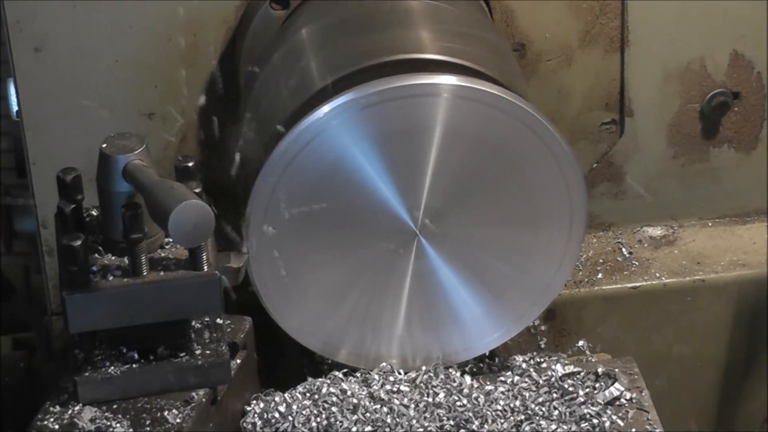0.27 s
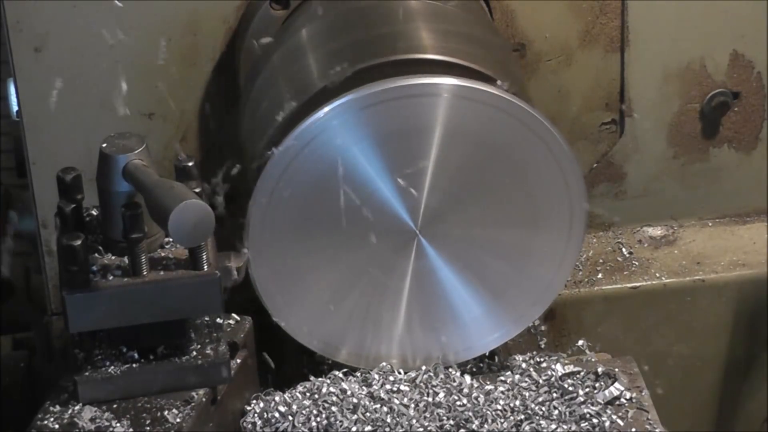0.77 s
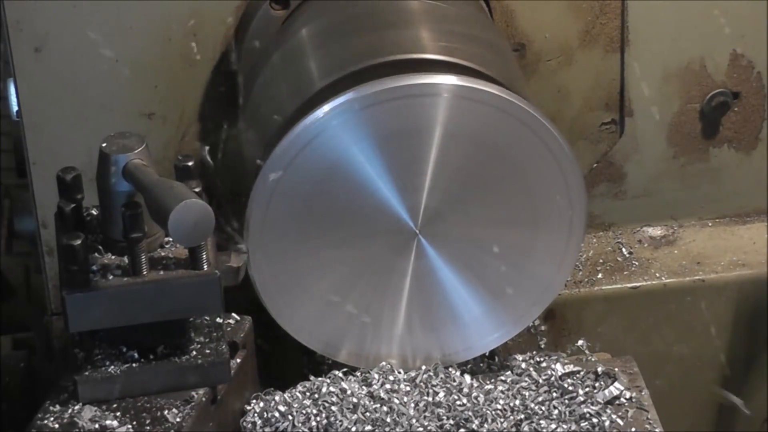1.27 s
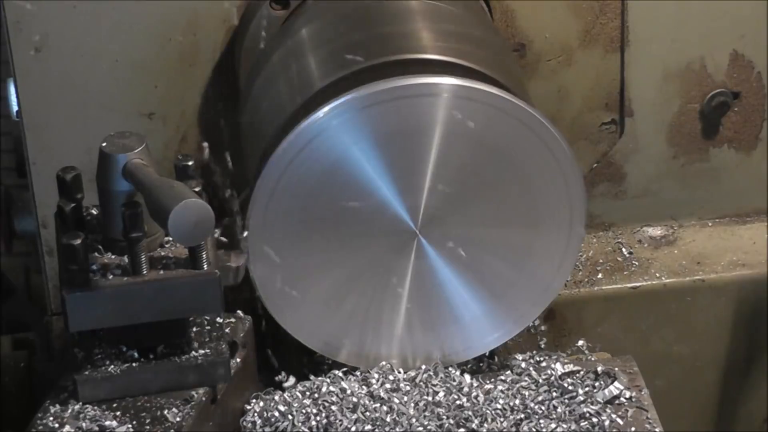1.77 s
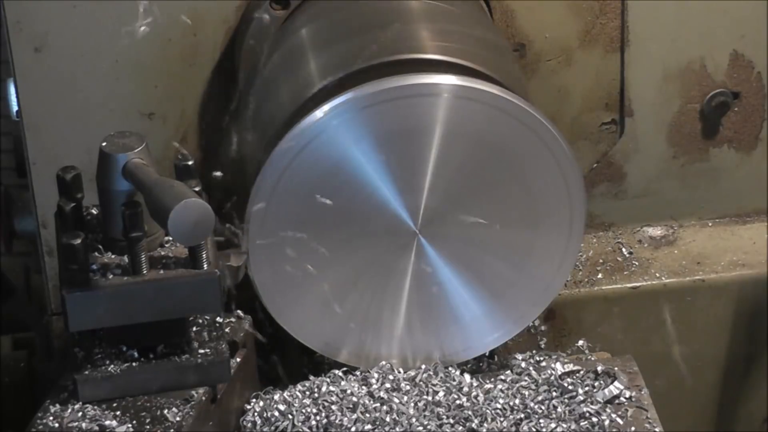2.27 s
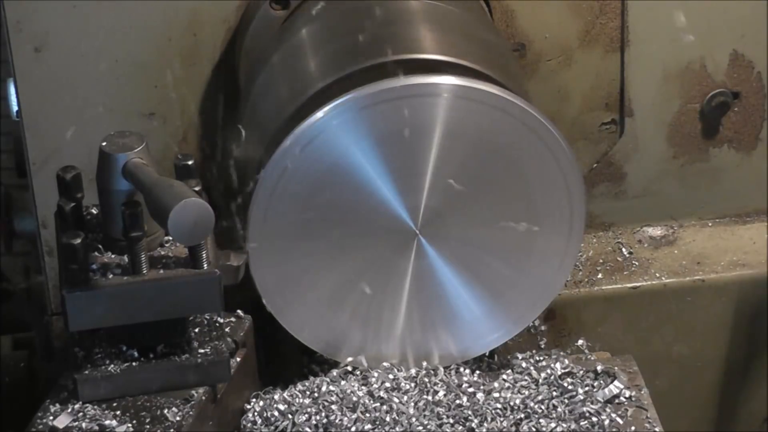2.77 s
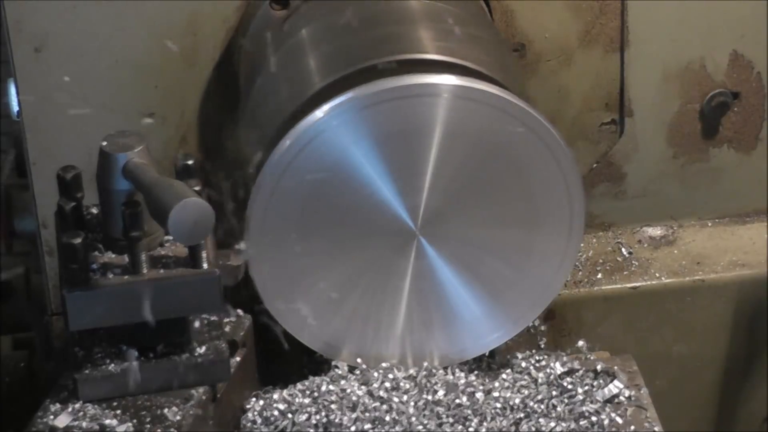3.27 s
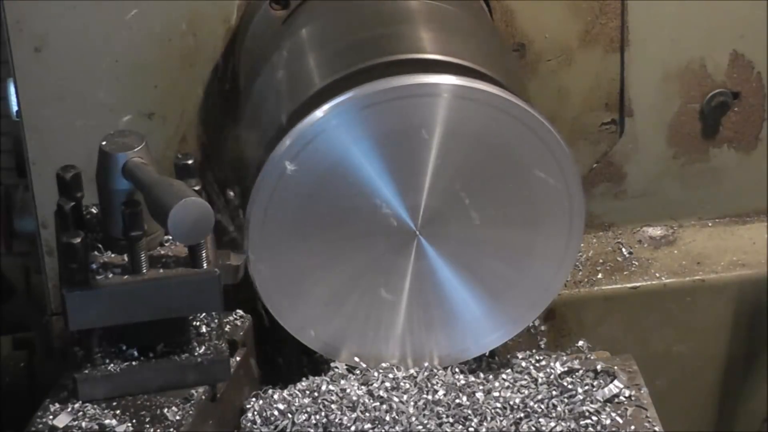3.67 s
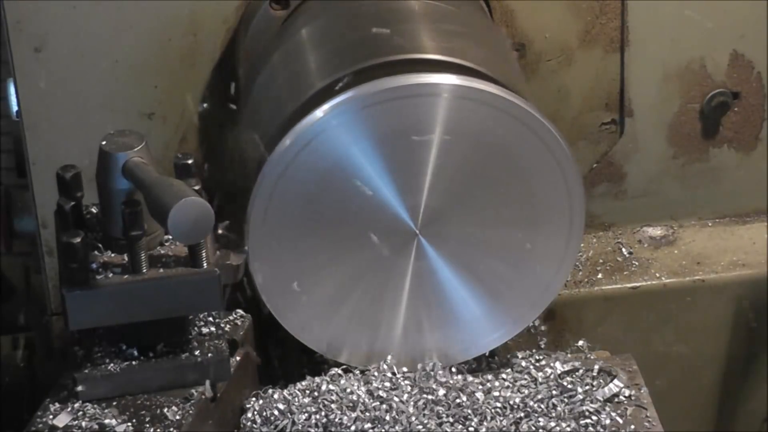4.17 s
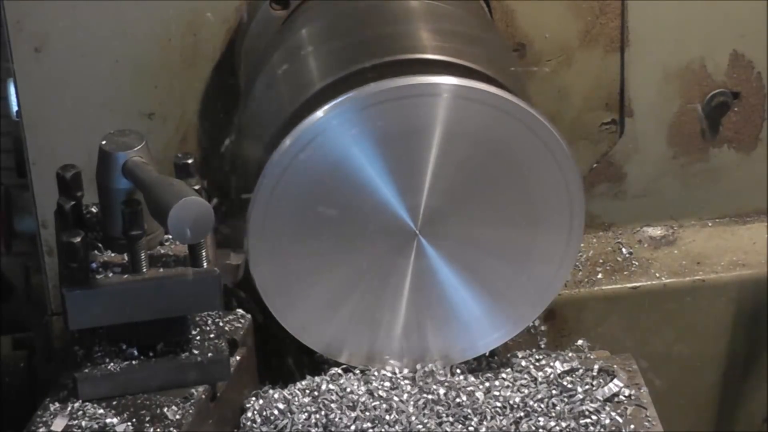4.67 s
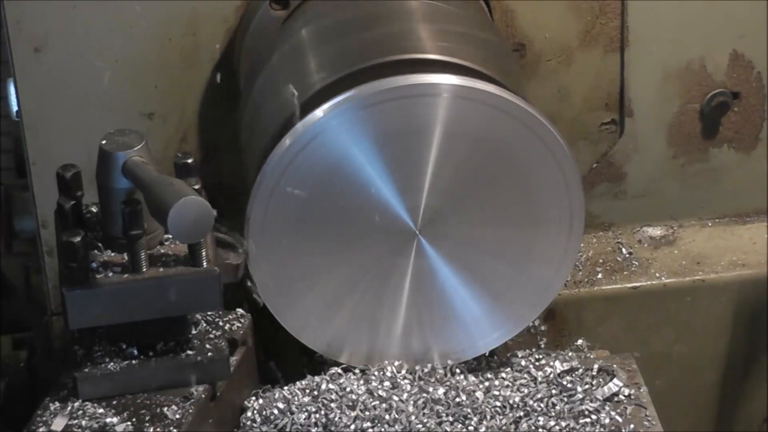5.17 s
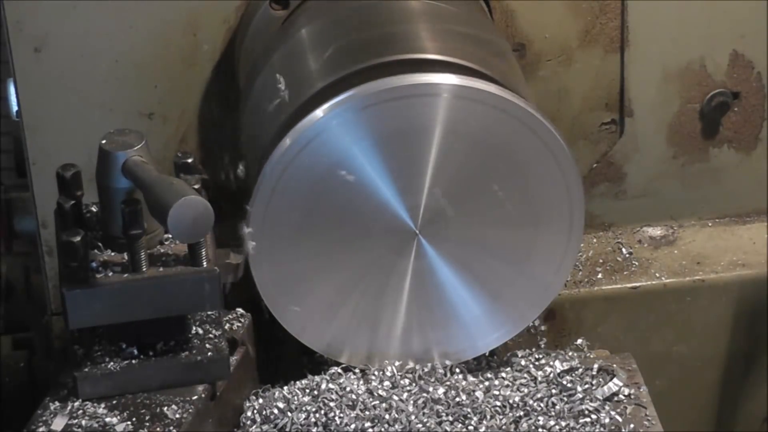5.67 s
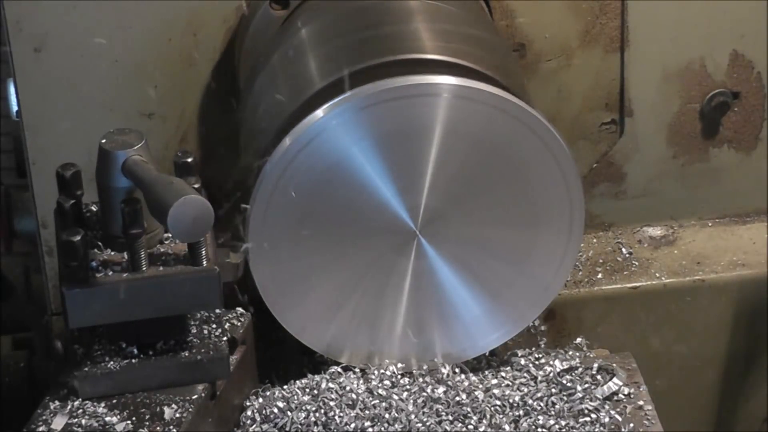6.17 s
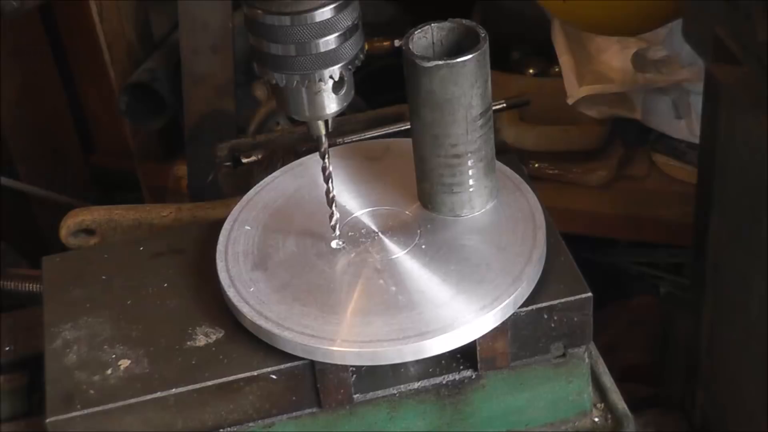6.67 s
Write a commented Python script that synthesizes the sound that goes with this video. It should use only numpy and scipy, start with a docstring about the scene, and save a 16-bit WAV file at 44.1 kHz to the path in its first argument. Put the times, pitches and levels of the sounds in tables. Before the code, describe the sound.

Close and loud, a cutting tool tears across a fast-turning metal face: gritty rasp, ringing disc and holder, shrill chatter squeal and a higher whistle, all pulsing rapidly with each turn. Low casting rumble and soft gear whines run steadily underneath, weighted right, with a brief cabinet boom past the middle. The cut never pauses; the sound simply stops dead.

```python
"""A lathe tool scrapes across a cast metal disc turning about 15 times a second; the sound is cut off at the end.
The tool rides over the waves it cut one turn earlier, so the scrape throbs with the spindle.
Two modes of the tool break into chatter: a squeal near 4 kHz and a whistle near 7 kHz.
Underneath, filtered noise makes the headstock rumble, sines make its gears whine, and the motor hums."""
import sys
import numpy as np
from scipy.fft import rfft, irfft, next_fast_len
from scipy.io import wavfile
from scipy.ndimage import uniform_filter1d, map_coordinates

SR = 44100
rng = np.random.default_rng(int(sys.argv[2]) if len(sys.argv) > 2 else 0)


def put_to_file(sound):
    """Save the sound as 16-bit audio at rate SR, in the file named by the first command-line argument."""
    columns = np.atleast_2d(sound).T  # one column per channel
    safe = np.clip(columns, -1, 1)
    whole_steps = np.round(safe * 32767)
    wavfile.write(sys.argv[1], SR, whole_steps.astype(np.int16))


N = 304731  # samples in the whole sound


def amp(db):
    """Turn decibels into a gain."""
    return 10 ** (np.asarray(db) / 20)


def unit(x):
    """Scale a signal to an rms (average strength) of 1."""
    return x / np.sqrt(np.mean(np.abs(x) ** 2) + 1e-20)


def clock():
    """Seconds at each sample."""
    return np.arange(N) / SR


def along(points, hz):
    """Read a curve of (Hz, value) points on a log frequency axis."""
    point_hz, values = np.transpose(points)
    return np.interp(np.log(hz + 1), np.log(point_hz + 1), values)


def curves(rows):
    """Join timed rows with straight lines: one curve for each column after the time."""
    seconds, *columns = np.transpose(rows)
    return [np.interp(clock(), seconds, column) for column in columns]


def wobble(rate):
    """A smooth random curve through `rate` random points a second."""
    points = rng.standard_normal(int(N * rate / SR) + 4)
    return map_coordinates(points, [np.arange(N) * rate / SR])


def swell(s, half_length_s, lift_db):
    """A smooth rise and fall in dB, highest at s seconds."""
    return lift_db * np.exp(-.5 * ((clock() - s) / half_length_s) ** 2)


# How hard the tool is fed into the face. Each row: time in seconds, load in dB about the usual.
LOAD = [(0.0, -0.15), (0.5, 0.5), (0.6, -0.8), (1.4, -0.26), (2.0, 0.8), (2.8, -0.6), (3.4, 1.3), (3.5, -2),
        (4.0, 0.1), (4.2, 1.8), (4.8, 0.7), (5.2, 2.5), (5.5, -3), (5.9, 1), (6.1, -1.8), (6.5, -1.2)]


def level(start_db, drift_db_per_s, follow):
    """Level in dB of a part that drifts steadily and follows the load."""
    return start_db + drift_db_per_s * clock() + follow * curves(LOAD)[0]


def filtered(x, response):
    """Shape the spectrum of x by a function of frequency."""
    size = next_fast_len(N + SR // 4)  # spare room so that the end does not wrap onto the start
    spectrum = rfft(x, size) * response(np.fft.rfftfreq(size, 1 / SR))
    return irfft(spectrum, size)[..., :N]


def peak(offset_hz, width_hz):
    """Gain of a resonance with steep skirts, offset_hz from its centre."""
    return 1 / (1 + (offset_hz / width_hz) ** 2)


# How alike left and right are. Each row: frequency in Hz, likeness (1 is identical).
LIKENESS = [(40, .15), (90, .45), (190, .88), (240, .97), (290, .78), (400, .8), (1000, .67), (1900, .76),
            (2400, .9), (4000, .95), (10000, .99), (14000, .72)]


def body(pair, modes, bed=None):
    """Two unrelated forces ring a body's modes and noise bed; stereo whose middle has rms 1."""
    def response(hz):
        power = sum((amp(db) * peak(hz - centre, width)) ** 2 for centre, width, db in modes)
        if bed is not None:
            power = power + amp(along(bed, hz)) ** 2
        # the less alike the two ears, the more goes to the side signal
        spread = np.arccos(np.clip(along(LIKENESS, hz), -1, 1)) / 2
        return np.sqrt(power) * np.array([np.cos(spread), np.sin(spread)])
    mid, side = filtered(pair, response)
    return np.array([mid + side, mid - side]) / np.std(mid)


# The motor's level. In order: dB at the start, drift in dB per second, dB per dB of load.
HUM_LAW = (-41, -1.5, .3)


def motor(hum_hz=120):
    """The motor's iron hums at twice the mains frequency, slowly easing off."""
    phase = 2 * np.pi * hum_hz * clock() + 0.11 * wobble(4.4)
    hum = unit(np.sin(phase))
    return amp(level(*HUM_LAW) + .7 * wobble(5.4)) * hum


# Resonances of the headstock casting. Each row: centre in Hz, width in Hz, relative dB.
CASTING = [(372, 24.4, -2.5), (422.5, 5.7, -1), (474, 20, -2.5), (544, 23, -7), (709.5, 15, -3),
           (728, 19, -7), (970.4, 12, -4), (1093, 8.9, -8.5)]
# Broad noise between those resonances. Each row: frequency in Hz, relative dB per Hz.
RUMBLE = [(20, -56), (45, -40), (70, -38.5), (90, -27.5), (135, -19), (170, -28.5), (220, -17), (330, -16),
          (600, -14), (1200, -15.5), (2000, -15), (5000, -66.5)]
# Gear whines. Each row: cycles per spindle turn, dB before the shared level and wobble.
GEARS = [(28, -42), (46, -37.5), (48, -44), (64, -44.5), (72, -41)]
# The cabinet's resonance. Each row: centre in Hz, width in Hz, relative dB.
CABINET = [(238.5, 10.5, 0)]
# Swells of the sheet-metal cabinet. Each row: peak time in seconds, half length in seconds, lift in dB.
BOOMS = [(1.85, 0.092, 2.5), (4.248, 0.078, 7.5)]
# Levels before trims. In order: dB at the start, drift in dB per second, dB per dB of load.
HEADSTOCK_LAW = (-22.5, -0.54, .9)
CABINET_LAW = (-32, -0.94, .7)


def headstock(turns):
    """Gear teeth rattle the casting, shake the cabinet and whine in step with the spindle."""
    drive_db = level(*HEADSTOCK_LAW)
    rumble = amp(drive_db - 1.0) * body(rng.standard_normal((2, N)), CASTING, RUMBLE)
    boom_db = level(*CABINET_LAW) + sum(swell(*row) for row in BOOMS)
    boom = amp(boom_db) * body(rng.standard_normal((2, N)), CABINET)
    whine = 0
    for teeth, db in GEARS:
        gain = amp(db + 1.4 * wobble(6))
        whine = whine + gain * np.sin(2 * np.pi * teeth * turns + 0.5 * wobble(9))
    # the whine follows only the changes in drive, not its overall level
    return rumble + boom + amp(drive_db - drive_db.mean() + 3.0) * whine


TURN_SIZE = 2900  # points of surface around one turn
# How well the surface waves last. Each row: time in seconds, share that survives one turn.
MEMORY = [(0, 0.81), (1.5, 0.7), (3.4, 0.67), (3.9, 0.91), (6.5, .9)]


def groove(turns):
    """Two noises read off the turning face: each turn inherits part of the last turn's waves."""
    waves = rng.standard_normal((2, int(turns[-1]) + 2, TURN_SIZE))
    kept = np.interp(np.arange(waves.shape[1]), turns, curves(MEMORY)[0])
    kept = np.clip(kept, 0, .98)
    for k in range(1, len(kept)):
        fresh = np.sqrt(1 - kept[k] ** 2)  # new roughness keeps the total strength steady
        waves[:, k] = kept[k] * waves[:, k - 1] + fresh * waves[:, k]
    return np.array([map_coordinates(w.ravel(), [turns * TURN_SIZE]) for w in waves])


# Wavy and smooth sectors of the face, met once a turn; each builds up and wears away.
# Each row: deepest time in seconds, half length in seconds, place in turns, half width in turns,
# then the dB lifts of scrape, squeal and whistle before limiting and evening out.
SECTORS = [(.6, .8, 0.2, 0.11, -1.5, 7.5, 5), (4.3, 1.1, 0.2, 0.031, -0.5, 7.5, 3.5),
           (5.16, 0.48, 0.34, 0.1, 7, -2, 4), (5.2, 1.5, .65, .05, 1, 0.5, 0.5),
           (4.9, 2.5, .75, .06, -0.5, 4.5, 3.5), (5.6, .7, 0.87, .085, -10.5, -9, -8),
           (5.7, 1.1, 0.48, 0.045, 0.5, -6, -9), (6.1, .5, 0.24, .08, 0, 8.5, 11)]
# Smaller patches come and go: seconds between fresh patterns, then dB depth for scrape, squeal, whistle.
PATCH_LIFE_S, PATCH_DB = 0.4286, (-1.5, 1, 2.5)


def throbs(turns, reach_db=9, order=32, count=18):
    """Gains of scrape, squeal and whistle as sectors and `count` chance patches pass under the tool."""
    t = clock()
    coarse, angle = t[::order], turns[::order]  # worked out at every 32nd sample
    db = np.zeros((3, len(coarse)))
    for s, life, place, width, *lift_db in SECTORS:
        away = (angle - place + .5) % 1 - .5  # shortest way round the face, in turns
        shape = np.exp(-.5 * ((coarse - s) / life) ** 2 - .5 * (away / width) ** 2)
        db += np.outer(lift_db, shape)
    for part, face in enumerate(rng.standard_normal((3, order, count))):
        spot = [coarse / PATCH_LIFE_S, angle % 1 * count]
        db[part] += PATCH_DB[part] * map_coordinates(face, spot, mode="grid-wrap")
    # lifts and dips level off smoothly at reach_db
    gain = amp(reach_db * np.tanh(db / reach_db))
    # evened out over about two turns, so the throb only shifts energy around
    gain = gain / np.sqrt(uniform_filter1d(gain ** 2, 2 * TURN_SIZE // order))
    return [np.interp(t, coarse, g) for g in gain]


def chatter(turns, pitch, throb, width_hz, limit):
    """A tool mode fed by its own waves; the swing levels off as the tip starts to leave the cut."""
    a, b = filtered(groove(turns), lambda hz: peak(hz, width_hz))
    swing = unit(throb * (a + 1j * b))
    swing = unit(swing / np.sqrt(1 + np.abs(swing / limit) ** 2))
    # shift the slow swing up to the pitch of the mode
    carrier = np.exp(2j * np.pi * np.cumsum(pitch) / SR)
    return unit(np.real(swing * carrier))


def slow_bursts(turns, depth, width_hz):
    """Uneven force from slow surface waves, which partly return on the next turn."""
    slow = unit(filtered(groove(turns)[0], lambda hz: peak(hz, width_hz)))
    return unit(amp(depth * slow))


# Resonances of disc, tool holder, shank and tip. Each row: centre in Hz, width in Hz, relative dB.
DISC = [(1383.6, 15, 7), (1495, 140, -0.5), (1469, 48, 2.5), (1764, 13, -0.5)]
HOLDER = [(1995, 48, -10.5), (2384, 120, 0), (2479, 66, 1), (2676, 18, -2), (3350, 170, -8.5),
          (3800, 14, -16), (3857, 32, -5.5), (4526, 120, -6.5), (5164, 120, -15.5)]
SHANK = [(4243, 54, 4.5), (4256, 64, 3.5), (4330, 33, -7.5)]
TIP = [(6460, 200, -3.5), (6810, 150, 8), (6960, 29, 11), (7070, 39, 5.5), (9330, 200, -12),
       (10210, 120, -0.5), (12900, 350, -21.5), (14010, 110, -12)]
# Noise of the tearing chip, and its hiss at the tip. Each row: frequency in Hz, relative dB per Hz.
RASP = [(300, -53), (900, -30), (1300, -18), (1900, -12.5), (2200, -17.5), (2900, -11), (3700, -16),
        (4800, -22), (6000, -23), (8000, -44.5), (15600, -79)]
HISS = [(4000, -45.5), (5700, -13.5), (6300, -11.5), (7800, -19.5), (10000, -13.5), (11500, -25.5),
        (14500, -28), (15600, -34.5)]
# Levels before trims. In order: dB at the start, dB per second as the tool moves across, dB per dB of load.
SCRAPE_LAW = (-21.5, -0.26, 1)
DISC_LAW = (-24, -.55, 0.73)
HOLDER_LAW = (-22, 0, .8)
WHISTLE_LAW = (-22.5, .04, 0.81)
# The disc rings most in one zone of the face: peak time in seconds, half length in seconds, lift in dB.
RINGING_ZONE = (4.45, 0.88, 3)
# Strength of the main chatter. Each row: time in seconds, level in dB before trims.
SQUEAL = [(0.0, -19.5), (1.9, -17.5), (2.1, -19.3), (2.2, -16.5), (3.2, -16.5), (3.6, -18), (4.8, -15.5),
          (5.0, -17), (5.9, -16.5), (6.0, -14.5), (6.2, -17.5), (6.5, -16)]
# Swells of the whistle. Each row: peak time in seconds, half length in seconds, lift in dB.
WHISTLES = [(0, .3, 1), (6.2, .3, 1)]
# both chatter modes creep sharp during the cut
SQUEAL_HZ, SQUEAL_RISE_HZ_PER_S = 4126, 6.4
WHISTLE_HZ, WHISTLE_RISE_HZ_PER_S = 6805, 28


def cut(turns):
    """The tearing chip rasps and rings disc, holder, shank and tip; two modes of the tool break into chatter."""
    t = clock()
    scrape_db = level(*SCRAPE_LAW)
    disc_db = level(*DISC_LAW) + swell(*RINGING_ZONE)
    squeal_db, = curves(SQUEAL)
    whistle_db = level(*WHISTLE_LAW) + sum(swell(*row) for row in WHISTLES)
    squeal_hz = SQUEAL_HZ + SQUEAL_RISE_HZ_PER_S * t
    whistle_hz = WHISTLE_HZ + WHISTLE_RISE_HZ_PER_S * t
    # the tool's bite into the patches keeps varying
    bite = np.clip(1 + .15 * np.array([wobble(20), wobble(20), wobble(20)]), .5, 1.3)
    scrape_throb, squeal_throb, whistle_throb = np.array(throbs(turns)) ** bite
    # hard and soft spots in the casting roughen the force on all the rung parts together
    grain = slow_bursts(turns, depth=0.93, width_hz=79)
    rasp = amp(scrape_db - 6.0) * scrape_throb ** 0.89 * body(groove(turns), [], RASP)
    disc = amp(disc_db) * scrape_throb ** .45 * body(groove(turns), DISC)
    # the holder flexes in bursts
    flex = slow_bursts(turns, depth=1.1, width_hz=44)
    holder = amp(level(*HOLDER_LAW)) * flex * scrape_throb * body(groove(turns), HOLDER)
    shank = amp(squeal_db - 5) * squeal_throb ** 0.5 * body(groove(turns), SHANK)
    tip_throb = whistle_throb ** 0.28 * scrape_throb ** 0.17
    tip = amp(whistle_db - 1.0) * tip_throb * body(groove(turns), TIP, HISS)
    squeal = amp(squeal_db - 0.2) * chatter(turns, squeal_hz, squeal_throb, width_hz=45.7, limit=2.0)
    whistle = amp(whistle_db - 3.5) * chatter(turns, whistle_hz, whistle_throb, width_hz=133, limit=2.9)
    return grain * (rasp + disc + holder + shank + tip) + squeal + whistle


# The spindle's speed. Each row: time in seconds, turns per second.
SPEED = [(0.0, 15.127), (0.9, 14.961), (1.8, 14.985), (2.8, 15.174), (3.3, 15.109), (4.0, 15.259),
         (4.8, 15.194), (5.4, 15.362), (6.05, 15.23), (6.5, 15.316)]
# Balance of the two sides. Each row: frequency in Hz, left minus right in dB.
LEAN = [(30, -2), (70, -5), (130, -6), (330, -9), (500, -7), (750, -4.5), (1150, -4), (1800, -2),
        (2700, -1), (4200, -1.6), (6500, 0), (10000, 0), (14000, 1.3)]
# Timing of the two sides. Each row: frequency in Hz, radians by which left leads.
LEAD = [(90, 0), (120, -1), (150, 0), (260, 0), (690, .7), (1000, .45), (1800, .2), (2500, -.25),
        (3200, .05), (5500, 0), (7000, .3), (8000, 0)]
# The cut-off at the end. Each row: time in seconds, gain in dB.
CUT_OFF = [(6.5, 0), (6.503, -31), (6.518, -33), (6.53, -70), (6.54, -160)]


def scene():
    """The machine's low sounds lean to the right; the sound is cut off at the end."""
    turns = np.cumsum(curves(SPEED)[0]) / SR
    lathe = motor() + headstock(turns) + cut(turns)
    sides = np.array([[.5], [-.5]])  # left and right each take half of the difference

    def placing(hz):
        return amp(sides * along(LEAN, hz)) * np.exp(1j * sides * along(LEAD, hz))
    return filtered(lathe, placing) * amp(curves(CUT_OFF)[0])


TOP_HZ = 15600  # middle of the slope where the treble ends


def record(dry):
    """Peaks round off at full scale; nothing is kept above the band limit."""
    rounded = dry / (1 + dry ** 8) ** (1 / 8)
    return filtered(rounded, lambda hz: np.clip((TOP_HZ - hz) / 200 + .5, 0, 1))


dry = scene()
out = record(dry)
put_to_file(out)
```